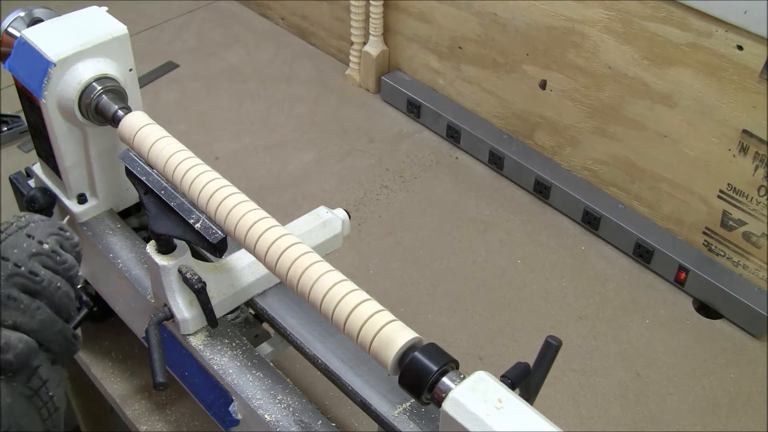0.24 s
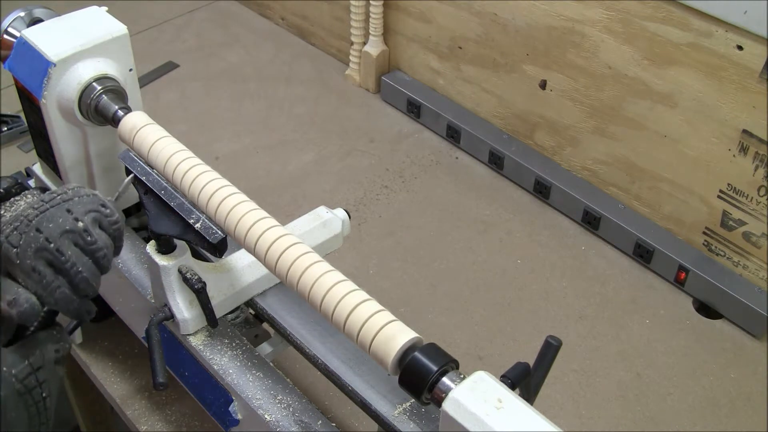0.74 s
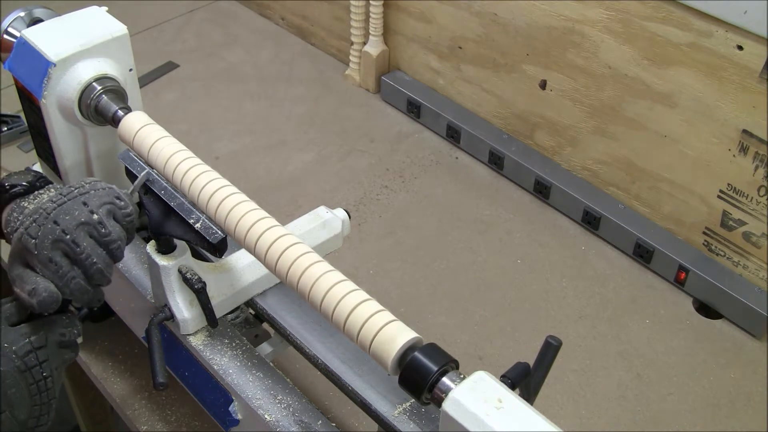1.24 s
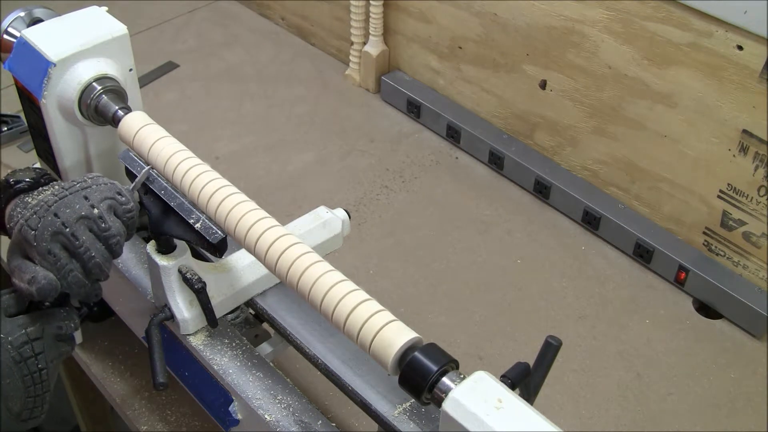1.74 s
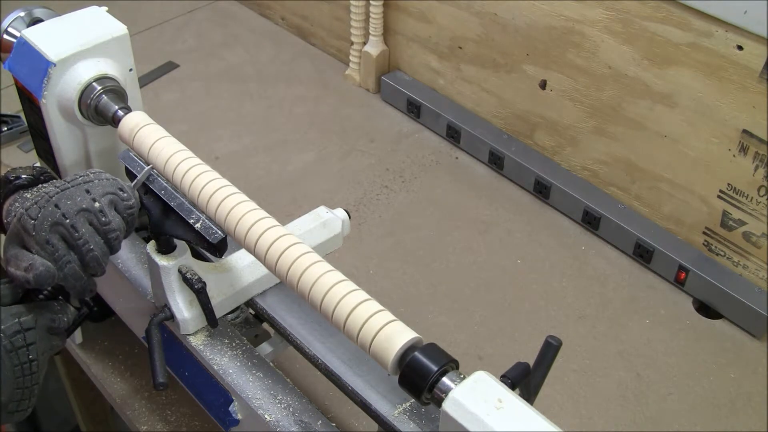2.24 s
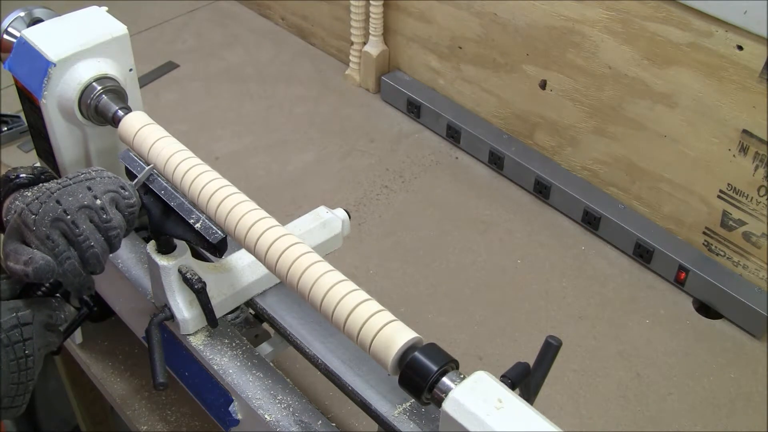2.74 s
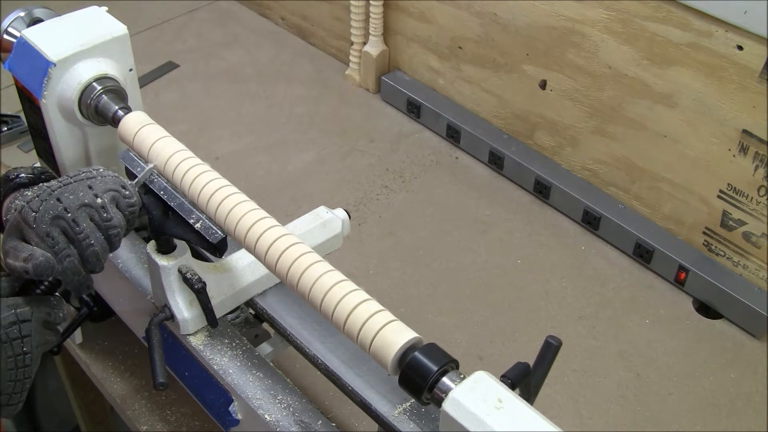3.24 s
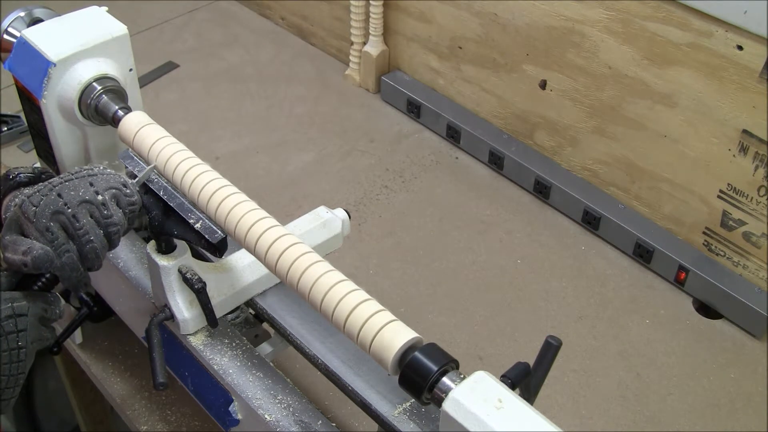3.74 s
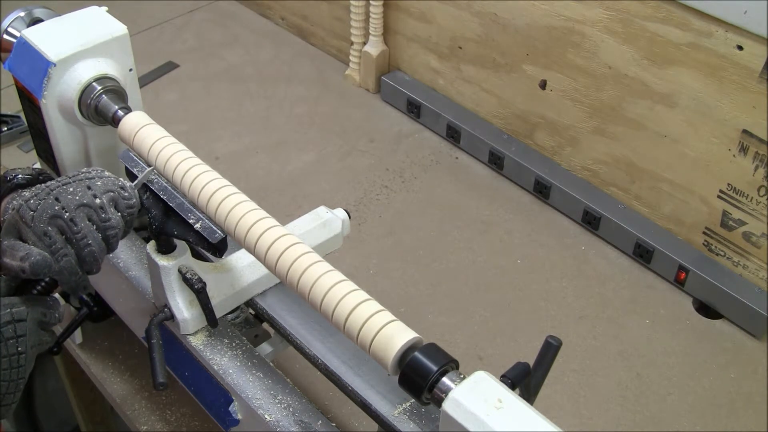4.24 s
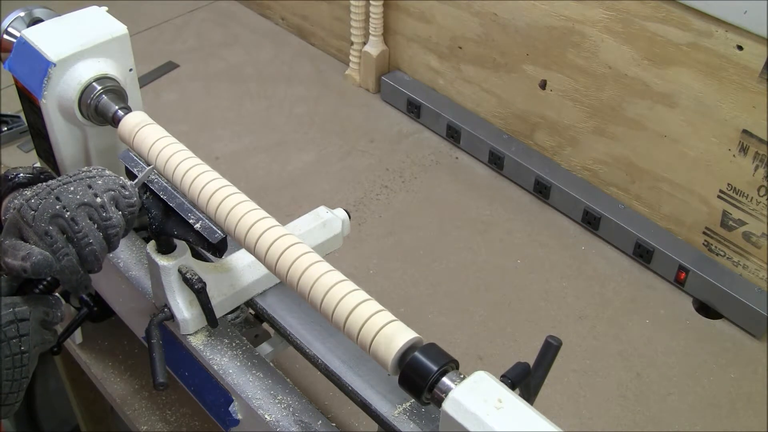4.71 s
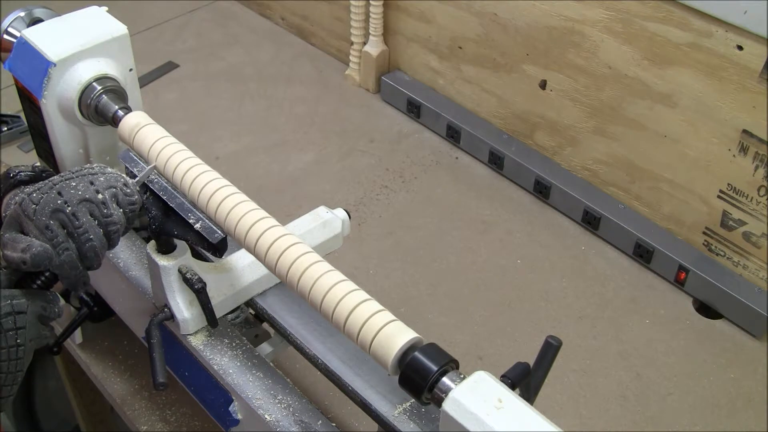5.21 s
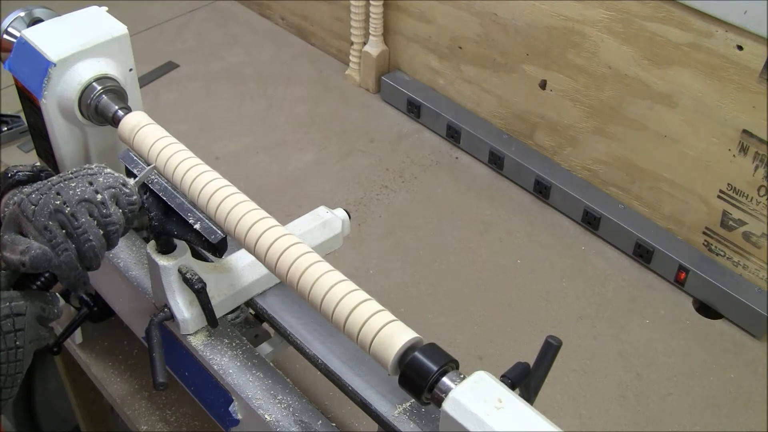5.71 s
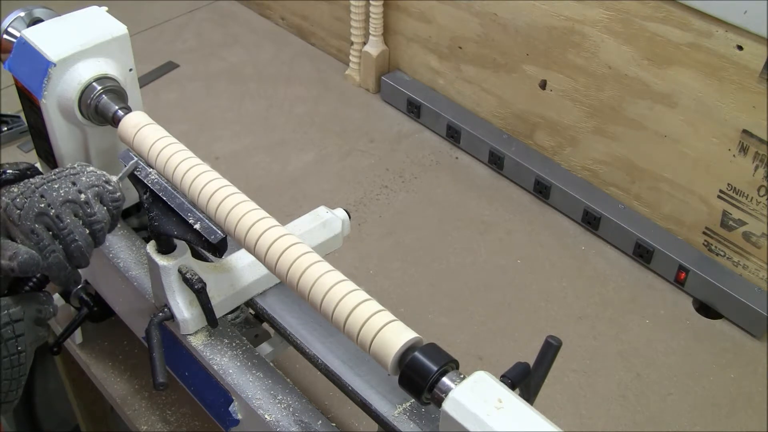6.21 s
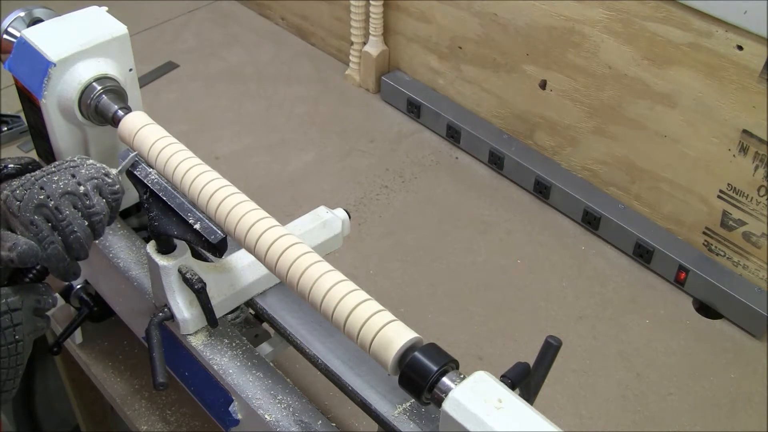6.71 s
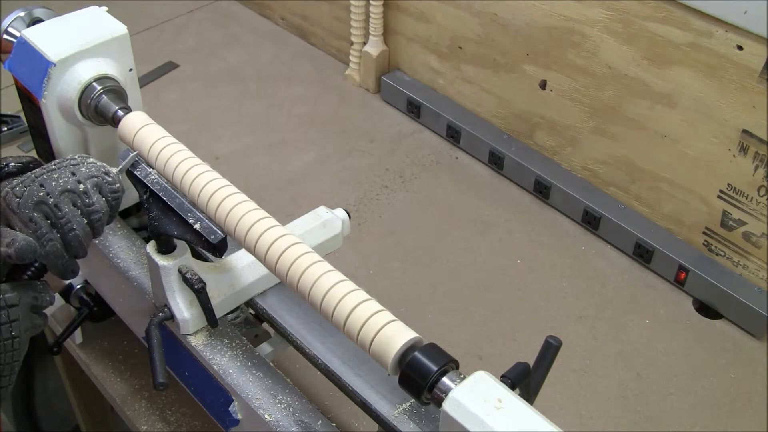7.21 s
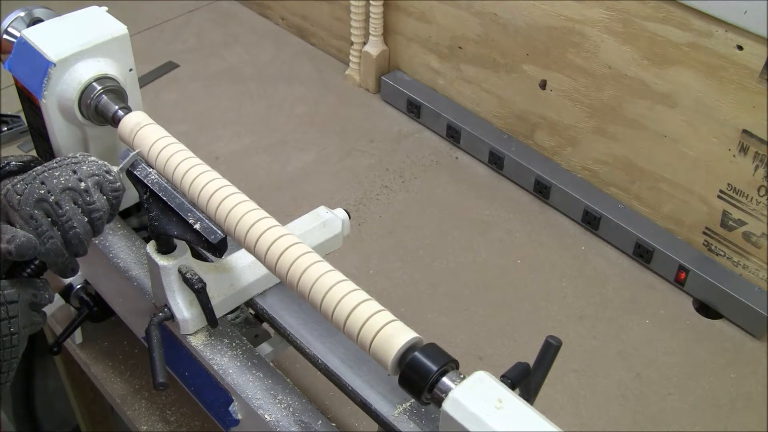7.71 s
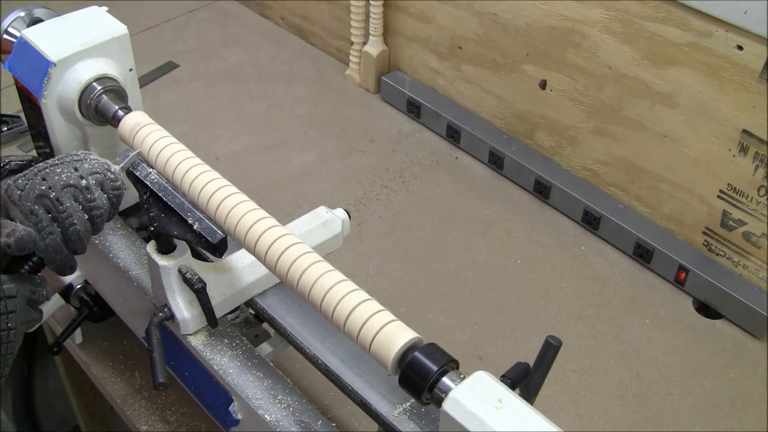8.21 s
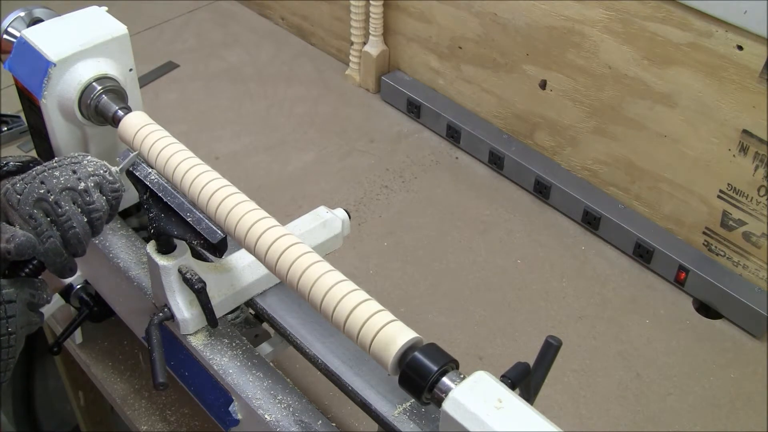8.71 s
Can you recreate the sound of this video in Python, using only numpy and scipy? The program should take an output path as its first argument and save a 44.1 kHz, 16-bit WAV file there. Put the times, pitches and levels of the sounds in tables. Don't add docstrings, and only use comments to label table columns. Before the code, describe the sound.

Electric lathe motor whirs and whines, while three loud rasping cuts into spinning wood chatter, hiss and squeal, the motor sagging under each.

```python
import sys
import numpy as np
from scipy import signal
from scipy.fft import rfft, irfft
from scipy.io import wavfile
from scipy.ndimage import uniform_filter1d

SR = 44100
rng = np.random.default_rng(int(sys.argv[2]) if len(sys.argv) > 2 else 0)


def voltage_ratio(level):
    return 10 ** (np.asarray(level, float) / 20)


def master(y):
    cut = np.clip(np.atleast_2d(y).T, -1, 1)
    pcm = np.round(cut * 32767)
    wavfile.write(sys.argv[1], SR, pcm.astype(np.int16))


N = 394694
T = np.arange(N) / SR
HZ = np.fft.rfftfreq(8192, 1 / SR)
IDLE_HZ = 123
PER_TURN = 5.44

TOUCH = [
    2.803,
    4.750,
    7.532,
]
# slowest moment in seconds, sag in Hz, freed in seconds, overshoot in Hz,
# belt slackening in seconds.
LOADS = [
    (3.7, 5.8, 4.1, 4.1, 4.07),
    (5.3, 7.8, 5.85, 4.9, 5.79),
    (8.2, 6.7, 8.62, 4.6, 8.46),
]
# frequency in Hz, level in dB per Hz.
WOOD = [
    [(470, -46), (800, -27), (990, -18), (1300, 2), (1610, -9), (1760, -5), (2000, -11.5), (2700, -12.5),
     (4130, -22.5), (6410, -13), (7360, -28), (8340, -21), (12800, -30), (16000, -28.5)],
    [(470, -47), (800, -13), (990, -17.5), (1230, -2.5), (2100, -10), (2730, -11), (3260, -9.5),
     (4630, -17.5), (6410, -14.5), (7450, -29), (8340, -21.5), (9220, -25), (13600, -26), (16000, -29)],
    [(470, -56), (800, -19), (990, -12), (1230, -1.5), (1460, -5.5), (1610, -11.5), (2240, -11.5),
     (2700, -9), (4240, -19.5), (5580, -15), (7450, -29), (9810, -28), (14500, -32), (16000, -35)],
]
# frequency in Hz, width in Hz, level in dB.
RINGS = [
    [(1320, 430, -3.5), (1796, 120, -4.5), (2300, 17, -20), (2726, 250, -6), (3140, 60, -7.5),
     (3590, 120, -11.5), (3860, 120, -16.5), (5150, 98, -19), (5900, 65, -10), (6350, 53, -12),
     (8180, 270, -16), (9930, 300, -19), (11400, 98, -27), (12900, 130, -25.5)],
    [(1286, 160, -3), (1786, 59, -10.5), (2150, 19, -8), (2656, 126, 2.5), (2960, 200, -3.5),
     (3760, 120, -8), (5130, 110, -19), (5370, 34, -23), (5800, 94, -12.5), (6260, 21, -14),
     (6340, 45, -18), (8200, 300, -16.5), (9940, 120, -22.5)],
    [(1196, 85, -3), (1834, 110, -7), (2320, 38, -12), (2630, 51, -4), (2950, 18, -17), (3110, 43, -4),
     (3700, 190, -13), (5000, 60, -26), (5100, 170, -24), (5500, 130, -23), (6560, 27, -23),
     (8200, 230, -22), (9700, 250, -22)],
]


def cutting():
    # time in seconds, bite in dB, out-of-round share (0-1).
    strokes = [
        [(2.79, -25, 0.47), (2.85, -20, 0.94), (2.9, -20.5, 0.87), (3.0, -20.5, 0.76), (3.3, -19, 0.03),
         (3.6, -19.5, 0.36), (3.97, -18.5, 0.73), (4.025, -23, 0.5), (4.07, -29, 0.8), (4.115, -42.5, 0.3),
         (4.135, -30.5, 0.2), (4.155, -46, .3), (4.2, -47, .45)],
        [(4.74, -35.5, .03), (4.785, -26, 0), (4.81, -32, .03), (4.862, -32, .1), (4.876, -24.5, 0),
         (4.92, -23, 0.1), (5.0, -20.5, .3), (5.1, -20, 0.57), (5.7, -20.5, 0.57), (5.77, -29.5, 0),
         (5.9, -71, 0)],
        [(7.52, -19.5, 0.68), (7.63, -21, 0.73), (7.68, -20, 0.61), (7.94, -19, 0.1), (8.3, -19, 0.56),
         (8.47, -19.5, 0), (8.62, -28.5, .1), (8.64, -34, .1), (8.66, -30.5, 0.2), (8.76, -33, 0.1),
         (8.772, -56, .1), (8.84, -70, 0.4)],
    ]
    graze_times = [0.45, 0.026, 0.42]
    # time in seconds, frequency in Hz.
    rest_notes = [
        [(2.9, 1320), (3.068, 1286), (4.05, 1300)],
        [(4.88, 1320), (5.09, 1320), (5.338, 1203), (5.76, 1310)],
        [(7.6, 1360), (7.918, 1355), (8.278, 1266), (8.5, 1300)],
    ]
    # level at entry in dB, at full depth in dB.
    deepenings = [
        [(0.5, 1.8), (-4, 12), (-6, 1), (0, -1.5), (1, -2), (4, 1), (8, -6), (1.5, 2.5), (0.3, -3)],
        [(2.5, -2.5), (-2, 10), (1.5, -3), (-2.5, -1.5), (-2.5, 0), (1, 3), (-1.5, -6), (-5, 3), (0.3, -10)],
        [(-2.5, 1.5), (-1.5, -8), (-2, 1), (2, -0.5), (0, -2), (-1, -2), (-2.5, -1), (-0.5, -3), (-5, -2)],
    ]
    # thump of the blank in dB, ring of the rest in dB, hiss of the edge
    # in dB, thump missing at first in dB, bedding-in time in seconds, top fizz against the hiss in dB.
    tones = [(-1.5, 2.5, -6, -8.5, 0.3, -3.5), (1, 5.5, -3.5, -9.5, 0.19, -5.5),
             (-2, 2, -6.5, -5, 0.3, -5.5)]
    # rasp note at entry in Hz, settled in Hz, breadth (factor), level in dB.
    rasps = [(3300, 2880, 1.24, 8.5), (2830, 3020, 0.66, 14.5), (3100, 2910, 0.62, 14.5)]
    squeal_levels = [-3, -6, -1]
    rest_lags = [0.66, 0.28, 0.24]
    drone_levels = [-8.5, -5.5, -3.5]
    return sum(map(cut, strokes, TOUCH, WOOD, RINGS, graze_times, rest_notes, deepenings, tones,
                   rasps, squeal_levels, rest_lags, drone_levels))


def cut(stroke, touch, wood, rings, graze_s, rest, deepening, tone, rasp, squeal_db, lag, drone_db):
    # lower and upper edge of the band in Hz (bite, thump, ring, hiss, fizz).
    bands = [(2000, 5000), (20, 900), (900, 2000), (5000, 9300), (9300, 20000)]
    memories = [0.36, 0.62, 0.46, 0.42, 0.29]
    # depth in dB, lag in turns.
    throbs = [(0.3, 0.23), (2, 0.071), (1.2, 0.61), (0.3, 0.47), (0.5, 0.52)]
    # frequency in Hz, width in Hz, level in dB.
    blank = [(295.7, 21.8, -2), (323, 14, -15.5), (400.5, 36, -4.5), (462, 54, -5), (528, 19, -9.5),
             (591, 72, -11.5), (647, 41, -16.5), (756, 29, -4), (896, 30, -6)]
    s, bite_points_db, oval = np.transpose(stroke)
    now = slice(round(s[0] * SR), round(s[-1] * SR))
    t = T[now]
    spin = drive()[1] / PER_TURN
    turns = spin[now] - spin[now][0]
    angle = (spin[now] - spin[round(touch * SR)]) % 1
    bite_db = np.interp(t, s, bite_points_db)

    high_side = np.minimum(angle / .2, 1) * np.exp(-angle / .5) * 2.1
    grain_db = 1.3 * np.cos(4 * np.pi * angle) + 1.3 * np.cos(8 * np.pi * angle)
    grain_db += .7 * wander(45, count=1)[0][now]
    share = np.clip(np.interp(t, s, oval), 0, 1) ** 2
    contact = (1 - share + share * high_side) * voltage_ratio(grain_db) * np.clip((t - touch) / .006, 0, 1)
    ridges = np.interp(angle, np.linspace(0, 1, 19), rng.standard_normal(19))
    chatter_db = 0.8 * wander(260, count=1)[0][now]
    contact *= voltage_ratio(chatter_db + 0.98 * ridges)

    # the wood damps the tool, most of all above 7 kHz
    damped = [(f, max(w, f / (45 if f < 7000 else 16)), db) for f, w, db in rings]
    tool = body(HZ, wood, damped, -2.0, -1.8)
    bed = [(190, -73), (255, -24), (900, -18.0)]  # (Hz, dB per Hz)
    stages = []
    for stage in np.transpose(deepening):
        modes = [(f, w, db + more_db) for (f, w, db), more_db in zip(blank, stage)]
        stages.append(body(HZ, bed, modes, 0, 0))
    entry, deep = stages
    depth = (t - t[0]) / (t[-1] - t[0])

    levels_db = band_db(t, angle * share, touch, bite_db, tone)
    bite, thump, ring, hiss, rub, fizz = levels_db
    sound = 0
    for (lo, hi), db, memory, (throb_db, late) in zip(bands, (bite, thump, ring, hiss, fizz), memories, throbs):
        band = 1 / np.sqrt((1 + (lo / (HZ + 1)) ** 12) * (1 + (HZ / hi) ** 12))
        spray_db = 1.6 * wander(90, count=1)[0][now] * (lo > 4000)
        turning_db = throb_db * np.sin(2 * np.pi * (angle - late))
        push = surface(turns, memory) * contact * voltage_ratio(db + spray_db + turning_db - 0.58)
        colours = [(entry, 1 - depth), (deep, depth)] if hi < 1000 else [(tool, 1)]
        for colour, part in colours:
            sound = sound + signal.oaconvolve(push * part, causal(colour * band))
    sound[:len(t)] += rest_note(t, turns, angle - lag, contact, ring, rest)
    sound[:len(t)] += rasping(t, turns, contact, rub, rasp)
    notes = squeal(t, angle, bite, graze_s, squeal_db) + drone(t, angle, thump, drone_db)
    sound[:len(t)] += notes * (t > touch)
    sound = shifting(sound, graze_s)[:N - now.start]
    out = np.zeros(N)
    out[now.start:now.start + len(sound)] = sound
    return out


def band_db(t, angle, touch, bite_db, tone):
    # extra before bedding in in dB, slope in dB per dB of lighter
    # bite, loss between the first knocks in dB.
    habits = [(0.1, -0.36, -30), (2, -0.1, -6), (-0.5, -0.81, -14), (6, -0.66, -49)]
    *steady_db, late_db, bed_s, fizz_db = tone
    fresh = np.exp(-(t - touch) / bed_s)
    light = np.clip(-19 - bite_db, 0, 12)
    skip = angle * np.exp(-(t - touch) / 0.094)
    bite, thump, ring, hiss = [bite_db + db + new_db * fresh + slope * light + skip_db * skip
                               for db, (new_db, slope, skip_db) in zip((0, *steady_db), habits)]
    labour = np.interp(t, T[::99], strain()[1][::99]).clip(None, 0)
    thump = thump + late_db * fresh + labour
    rasp = bite - 14 + 1.15 * light
    fizz = hiss + fizz_db + 5.5 * fresh - 1.5 * light
    return bite, thump, ring, hiss, rasp, fizz


def surface(turns, memory):
    fibres = rng.standard_normal((int(turns[-1]) + 2, 2048))
    fibres *= voltage_ratio(2.14 * np.minimum(rng.exponential(1, fibres.shape), 5))
    fibres = signal.lfilter([1], [1, -np.clip(memory, 0, .9)], fibres, axis=0)
    return evened(fibres.ravel()[(turns * 2048).astype(int)])


def rest_note(t, turns, angle, contact, ring_db, rest):
    beat_db = 3 * np.sin(2 * np.pi * angle)
    push = surface(turns, 0.13) * contact * voltage_ratio(ring_db + beat_db)
    note_hz = np.interp(t, *np.transpose(rest)) + 88 * np.cos(2 * np.pi * angle)
    return voltage_ratio(16.0) * resonate(push, note_hz, 62)


def rasping(t, turns, contact, rub_db, rasp):
    # multiple of the rasp note, width in Hz, level in dB, how far it follows the glide (0-1).
    rasp_modes = [(.8, 260, 0.5, .3), (1, 260, 5.5, 0.7), (1.125, 240, 2, 1), (1.7, 180, -2.5, .1),
                  (2.06, 450, -10, .1), (2.27, 298, -26, .1)]
    entry_hz, settled_hz, breadth, rasp_db = rasp
    rub = surface(turns, 0.14) * contact * voltage_ratio(rub_db + rasp_db)
    glide = (entry_hz - settled_hz) * np.exp(-(t - t[0]) / 0.052)
    return sum(voltage_ratio(db) * resonate(rub, k * (settled_hz + follow * glide), width * breadth)
               for k, width, db, follow in rasp_modes)


def squeal(t, angle, bite_db, graze_s, db):
    # frequency in Hz, level against the bite in dB.
    blade_notes = [(2730, 1.5), (3950, -6.5), (1336, -12)]
    burst = np.sin(np.pi * np.clip(angle / .62, 0, 1)) ** .6
    damped_db = -5.5 * (1 - np.exp(-((t - t[0]) / (graze_s + .05)) ** 2))
    notes = 0
    for (hz, note_db), drift, swell in zip(blade_notes, wander(140, count=3), wander(70, count=3)):
        phase = 2 * np.pi * np.cumsum(hz * (1 + 0.0218 * drift[:len(t)])) / SR
        notes = notes + voltage_ratio(note_db + 3.7 * swell[:len(t)]) * np.cos(phase)
    return notes * burst * voltage_ratio(bite_db + db + damped_db)


def drone(t, angle, thump_db, db):
    drift, swell = wander(60, count=2)[:, :len(t)]
    throb_db = 4 * np.sin(2 * np.pi * angle) + np.cos(4 * np.pi * angle) + 1.2 * swell
    phase = 2 * np.pi * np.cumsum(400.8 * (1 + 0.039 * drift)) / SR
    return voltage_ratio(thump_db + db + throb_db) * np.cos(phase)


def shifting(x, graze_s):
    # frequency in Hz, width in Hz, extra level in dB.
    graze = [(280, 106, -17.5), (2740, 140, 3.2), (3780, 200, 6.5), (6000, 360, 1.5), (6920, 210, 12),
             (8060, 750, 9.5), (4760, 520, 4), (1720, 200, -6), (756, 350, -6.5), (9700, 600, -7.5)]
    hz, t, z = signal.stft(x, SR, nperseg=512, noverlap=384)
    patches = uniform_filter1d(rng.standard_normal(z.shape), 4, 0)
    patches = evened(uniform_filter1d(patches, 45, 1))
    sing_db = sum(db / (1 + (2 * (hz - f) / w) ** 2) for f, w, db in graze)
    fading_db = np.outer(sing_db, np.exp(-(t / graze_s) ** 2))
    z = z * voltage_ratio(0.98 * patches * (hz[:, None] > 2000) + fading_db)
    return signal.istft(z, SR, nperseg=512, noverlap=384)[1][:len(x)]


def snaps():
    # time in seconds, peak in dB.
    catches = [
        (2.812, -8),
        (2.849, 1),
        (4.7894, -14),
        (4.82, -11),
        (4.8754, -5),
        (4.9092, -6),
        (4.921, -4),
        (7.5373, -9),
    ]
    t, out = np.arange(600) / SR, np.zeros(N)
    for (s, db), tear in zip(catches, rng.standard_normal((len(catches), 600))):
        out[round(s * SR):][:600] += tear * np.exp(-t / 0.002) * voltage_ratio(db - 10)
    return signal.oaconvolve(out, causal(body(HZ, WOOD[0], RINGS[0], 0.5, 2.0)))[:N]


def drive():
    # shortfall at the start in Hz, time constant in seconds.
    spin_up = [(24, .28), (2.5, 1.2)]
    t = np.arange(0, N / SR + .01, .005)
    hz = 123.1 - sum(short * np.exp(-t / lag) for short, lag in spin_up)
    for touch, (slowest, sag, freed, over, _) in zip(TOUCH, LOADS):
        hz -= sag * np.clip((t - touch) / (slowest - touch), 0, 1) ** 1.7 * (t < slowest)
        after = np.interp(t, [slowest, freed - .22, freed], [-sag, -4.6, over]) * (t >= slowest)
        hz += after * np.exp(-np.maximum(t - freed, 0) / .32)
    rate = np.interp(T, t, uniform_filter1d(hz, size=9, mode="nearest"))
    return rate, np.cumsum(rate) / SR, np.exp(-T / .4)


def strain():
    # start in seconds, end in seconds.
    spans = [
        (2.79, 4.2),
        (4.74, 5.9),
        (7.52, 8.84),
    ]
    start, end = spans[0]
    loaded = np.clip((T - start) / (end - start), 0, 1)
    return loaded, np.clip((drive()[0] - IDLE_HZ) / 4, -1.5 * loaded, 1.3)


def whine():
    # multiple of the drive rate, level before the first cut in dB, level once loaded in dB.
    orders = [(0.912, -62, -63), (2.0, -66, -65), (2.086, -60, -54), (2.194, -62, -74), (3.252, -67, -60),
              (3.333, -61, -65), (4.718, -59, -53), (4.83, -58, -58), (5.001, -51, -56), (5.92, -58, -62),
              (6.152, -57, -53), (7.356, -59, -70), (7.906, -59, -78), (8.0, -60, -59), (8.663, -54, -58),
              (8.785, -43, -54), (9.002, -45, -48), (9.206, -50, -53), (9.329, -60, -51), (9.662, -53, -56),
              (9.744, -52, -54), (10.001, -46, -46), (10.102, -49, -57), (10.816, -52, -49),
              (11.003, -40, -38), (11.087, -58, -51), (11.188, -45, -49), (11.42, -47, -73),
              (12.0, -51, -49), (12.09, -72, -55), (13.004, -46, -53)]
    # frequency in Hz, gain in dB.
    window = [(200, 11), (480, -6), (760, -16), (1030, -26), (1090, -1.5), (1140, -4), (1188, -1.5),
              (1235, -4.5), (1278, -1), (1302, -3), (1345, 4), (1378, 0.5), (1420, -4), (1470, -8.5),
              (1520, -6), (1590, -11)]
    rate, cycles, early = drive()
    loaded, racing = strain()
    lines = np.zeros(N)
    for (k, idle_db, late_db), flutter in zip(orders, wander(9.8, count=len(orders))):
        housing_db = np.repeat(read(window, k * rate[::64]), 64)[:N] - read(window, k * IDLE_HZ)
        shake_db = (4.5 * (k < 7) + 5 * (k < 4)) * np.maximum(racing, 0) - 2 * (k < 6)
        weak_db = 12 * (7 < k < 8.5) + 13 * (k > 12.5) - 3 * (11.9 < k < 12.05)
        weak_db += -5 * (9.9 < k < 11.1) - 12 * (3 < k < 4)
        weak_db += 9 * (abs(k - round(k)) > .02)
        shake_db -= early * weak_db + 8 * early ** 3 * ((k < 2.2) | (4.5 < k < 5.5))
        size = voltage_ratio(idle_db + (late_db - idle_db) * loaded + housing_db + shake_db + 1.3 * flutter + .7)
        phase = 2 * np.pi * (k * cycles + rng.random()) + .2 * flutter
        lines += np.sqrt(2) * size * np.cos(phase)
    return lines


def belt():
    # multiple of the belt rate, level in dB, extra while spinning up in dB.
    belt_lines = [(12, -64, 0), (14, -62, 2), (16, -66, 6), (17, -68, 10), (48, -66, 16), (70, -68, 15),
                  (134, -67, 14), (92, -66, 12), (341, -58, 0), (331, -56, -4), (366, -62, 0)]
    _, cycles, early = drive()
    racing = strain()[1]
    lap = 2 * np.pi * (cycles / 23 + 0.47)
    spin_up_db = 11 * np.exp(-((T - 0.36) / 0.28) ** 2)
    upper = voltage_ratio(-21 * np.tanh(1.8 * np.maximum(racing, 0)) + spin_up_db)
    pair = (np.cos(13 * lap) + upper * np.cos(15 * lap)) / np.sqrt(1 + upper ** 2)
    pair *= voltage_ratio(hum_db() + 3.5)
    choke_db = 7 * np.minimum(racing, 0)
    faint = sum(voltage_ratio(db + extra_db * early + choke_db) * np.cos(round(k) * lap) for k, db, extra_db in belt_lines)
    return np.sqrt(2) * (pair + faint)


def hum_db():
    level = -51 - 3 * np.exp(-(T / 0.35) ** 2)
    for touch, (*_, slack_s) in zip(TOUCH, LOADS):
        slack = np.clip((T - slack_s) / 0.11 + .5, 0, 1)
        level += -9.5 * np.clip((T - touch - 0.21) / .33, 0, 1) * (1 - slack)
        level += 6.5 * slack * np.exp(-np.maximum(T - slack_s, 0) / 0.58)
    return level


def whirr():
    # frequency in Hz, level in dB per Hz.
    housing = [(15, -37), (25, -52), (74, -11.5), (195, -17.5), (249, -16), (531, -10.5), (607, -11),
               (911, -12.5), (1100, -12), (1370, -3), (2050, -14), (3080, -14.5), (5880, -32),
               (12900, -35.5), (16000, -37)]
    # frequency in Hz, width in Hz, level in dB.
    housing_rings = [(600, 23, -1), (790, 9, 7), (1095, 80, 35.5), (1300, 21, -28), (1384, 110, 3),
                     (1470, 15, 3), (2670, 36, -19), (2810, 29, -2), (3020, 96, -16), (3350, 28, -22),
                     (5500, 140, 9)]
    turns = drive()[1] / PER_TURN
    knock = 1 + 0.059 * np.cos(2 * np.pi * turns)
    air_db = -47 - 2.5 * np.exp(-T / 0.099) + 9.0 + 15.0 * np.minimum(strain()[1], 0)
    air = rng.standard_normal(N) * knock * voltage_ratio(air_db)
    step = voltage_ratio(3 / (1 + (HZ / 5650) ** 40) - 3 / (1 + (HZ / 4300) ** 8))
    air = signal.oaconvolve(air, causal(step * body(HZ, housing, housing_rings, -0.42, -35.0)))[:N]
    fizz = signal.sosfilt(signal.butter(4, 7000, "high", fs=SR, output="sos"), air)
    ticks = np.exp(-(2 * turns % 1) / .13) * voltage_ratio(4 * wander(45, count=1)[0])
    return air + fizz * (2.2 * ticks - .35)


def shop(x):
    taps = np.zeros((2, SR // 2))
    at = np.arange(150, SR // 2 - 20, 20) + rng.integers(0, 20, (2, (SR // 2 - 151) // 20))
    np.put_along_axis(taps, at, rng.choice([-1., 1.], at.shape), 1)
    taps *= voltage_ratio(-60 * np.arange(SR // 2) / SR / 0.15)
    return signal.oaconvolve(x[None], taps / np.linalg.norm(taps[0]), axes=1)[:, :N]


def evened(x):
    return x / np.sqrt(np.mean(x ** 2) + 1e-20)


def read(points, hz):
    f, value = np.transpose(points)
    return np.interp(np.log(hz + 1), np.log(f + 1), value)


def body(hz, spectrum, rings, under_db, ring_db):
    power = sum(voltage_ratio(db + ring_db) ** 2 / (1 + (2 * (hz - f) / w) ** 2) ** 2 for f, w, db in rings)
    return np.sqrt(voltage_ratio(read(spectrum, hz) + under_db) ** 2 + power)


def causal(gain):
    log = np.log(np.maximum(gain, gain.max() * 1e-5))
    analytic = signal.hilbert(np.r_[log, log[-2:0:-1]])
    taps = np.fft.ifft(np.exp(np.conj(analytic))).real[:4096]
    return taps / np.linalg.norm(taps)


def resonate(x, hz, width):
    turn = np.exp(2j * np.pi * np.cumsum(hz) / SR)
    r = np.exp(-np.pi * width / SR)
    return 2 * (turn * signal.lfilter([1 - r], [1, -r], x / turn)).real


def wander(hz, count):
    steps = rng.standard_normal((count, int(N / SR * hz) + 2))
    return np.array([np.interp(T * hz, np.arange(len(s)), s) for s in steps])


def scene():
    # frequency in Hz, level in dB.
    apart_levels = [(60, -76), (130, -1), (290, -9.5), (640, -9), (1410, -10.5), (3100, -7), (6820, -1.5),
                    (15000, 5)]
    # frequency in Hz, level in dB.
    port_tilt = [(60, 0), (130, -1), (290, -3), (640, -2.5), (1410, -2), (3100, -0.5), (6820, -1),
                 (15000, -0.5)]
    work = cutting() + snaps()
    lines, air = whine(), whirr()
    both, apart = shop(air + work)
    hz = np.fft.rfftfreq(N, 1 / SR)
    mid = rfft(0.89 * (air + work) + lines + voltage_ratio(-7.0) * both + belt())
    side = rfft(apart) * voltage_ratio(read(apart_levels, hz) - 3.5)
    side += .06 * rfft(air + lines) * (hz > 200)
    lean = voltage_ratio(read(port_tilt, hz) / 2)
    return irfft(np.array([mid / lean + side, mid * lean - side])[::-1], N)


def band_limit(x):
    return signal.sosfilt(signal.butter(12, 15830, fs=SR, output="sos"), x)


def record(dry):
    edge = signal.firwin(255, 15800, window=("kaiser", 9), fs=SR)[None]
    limited = np.tanh(dry / 1.15) * 1.15
    return band_limit(signal.oaconvolve(limited, edge, "same"))


dry = scene()
out = record(dry)
master(out)
```